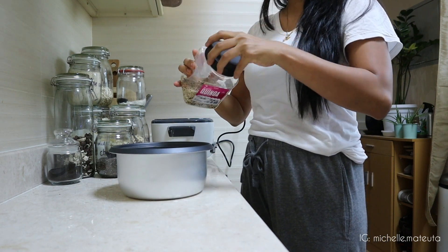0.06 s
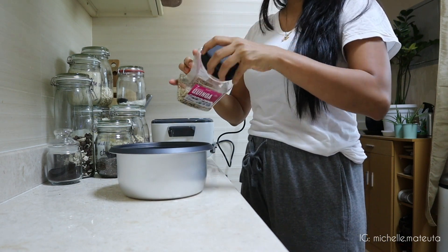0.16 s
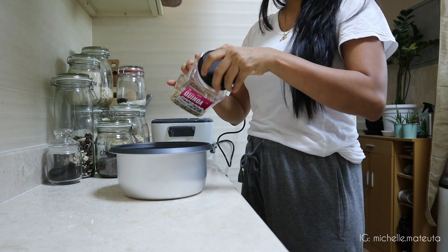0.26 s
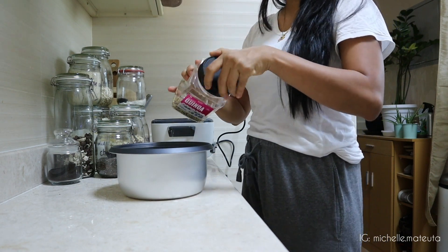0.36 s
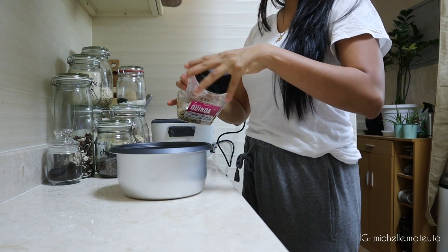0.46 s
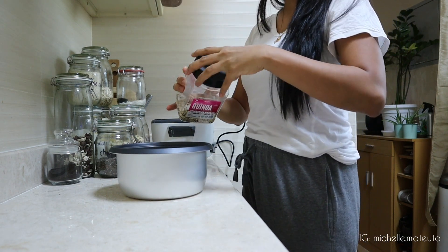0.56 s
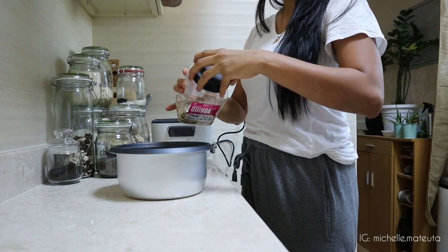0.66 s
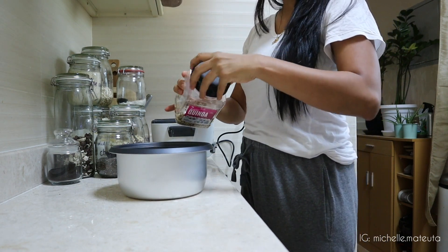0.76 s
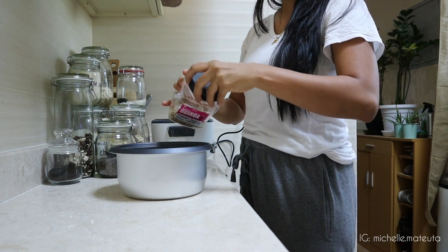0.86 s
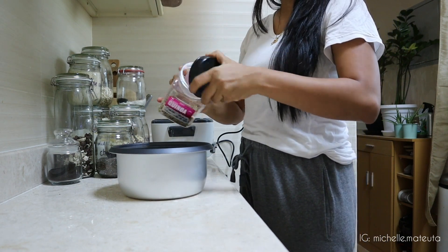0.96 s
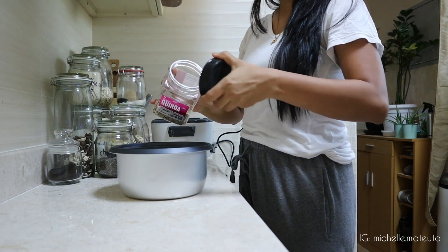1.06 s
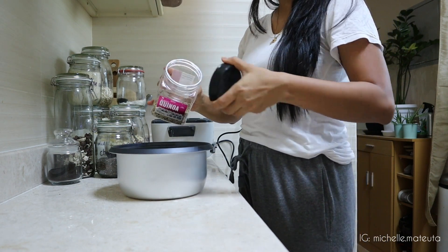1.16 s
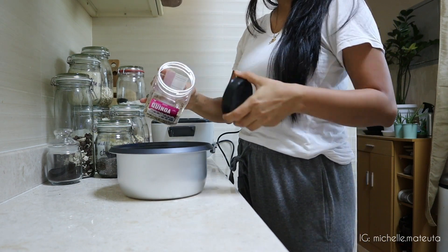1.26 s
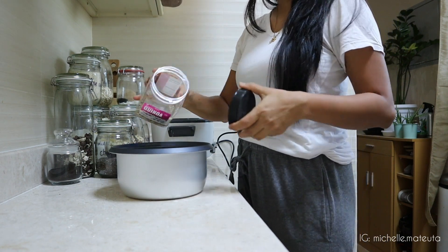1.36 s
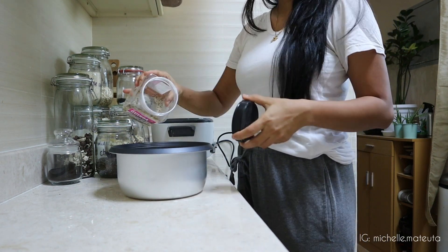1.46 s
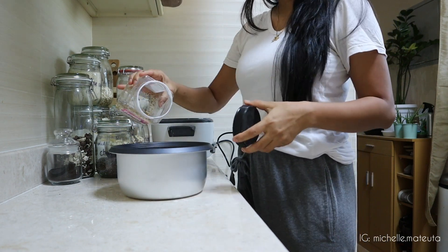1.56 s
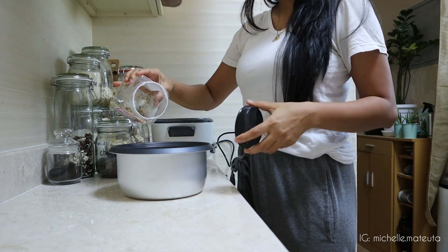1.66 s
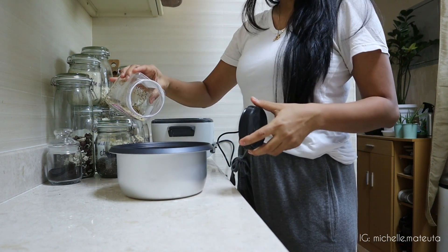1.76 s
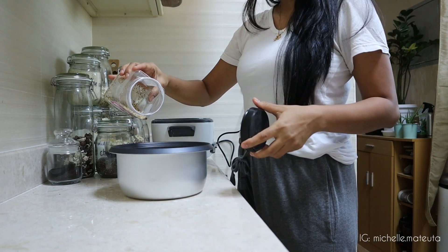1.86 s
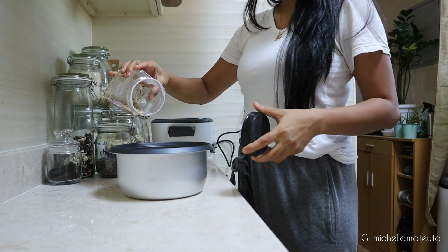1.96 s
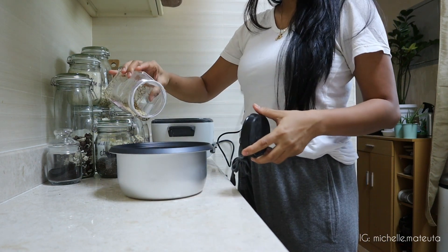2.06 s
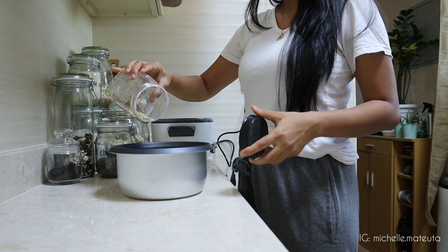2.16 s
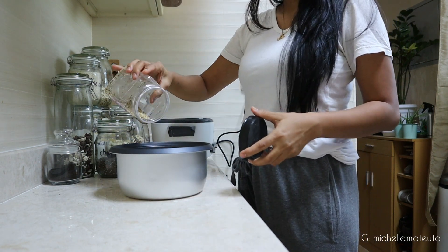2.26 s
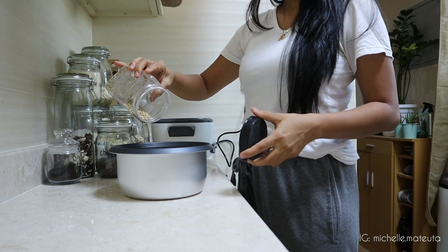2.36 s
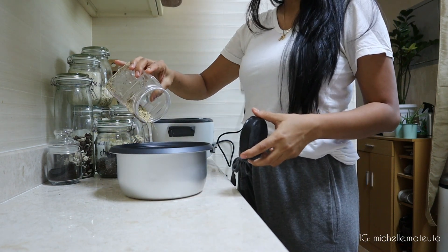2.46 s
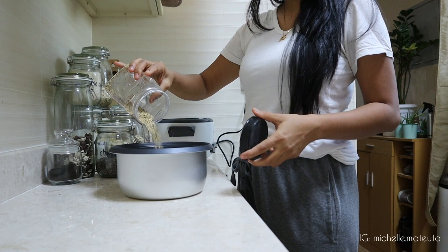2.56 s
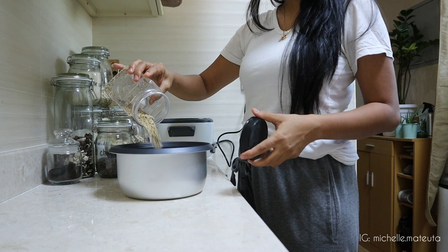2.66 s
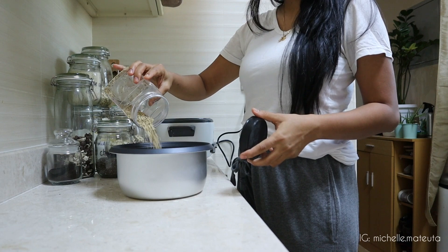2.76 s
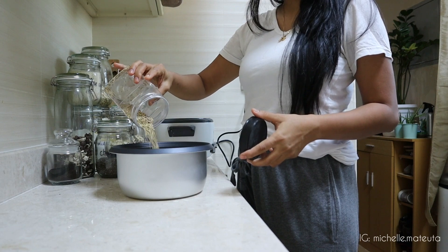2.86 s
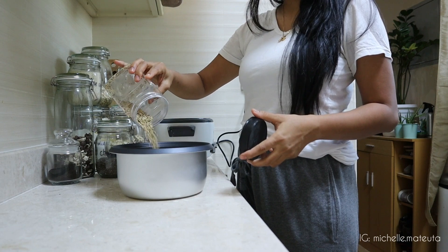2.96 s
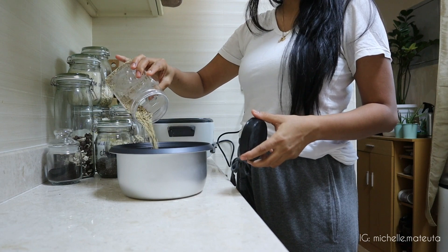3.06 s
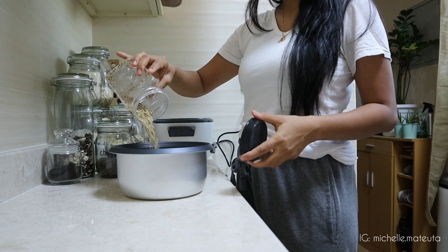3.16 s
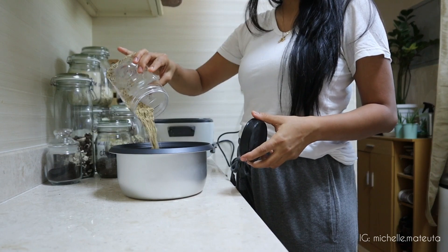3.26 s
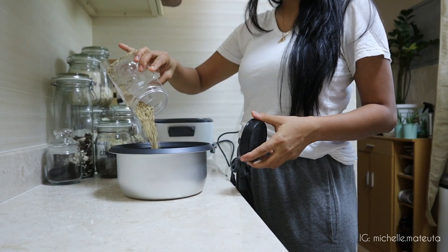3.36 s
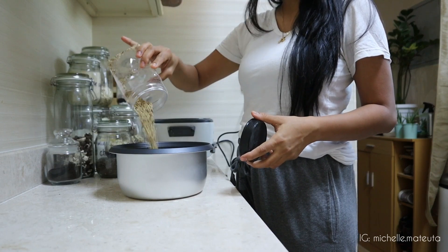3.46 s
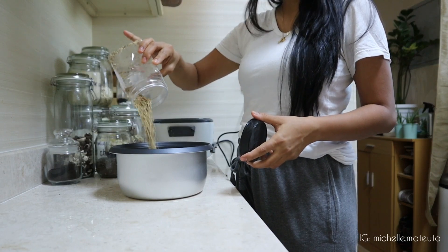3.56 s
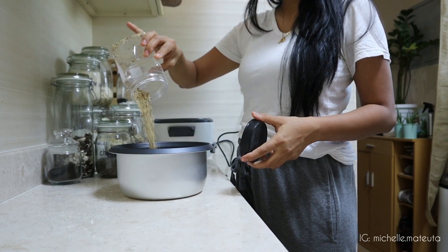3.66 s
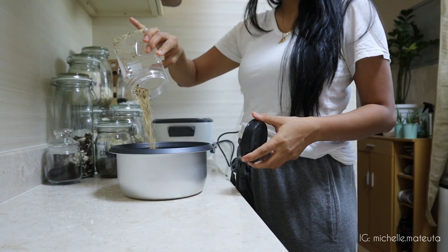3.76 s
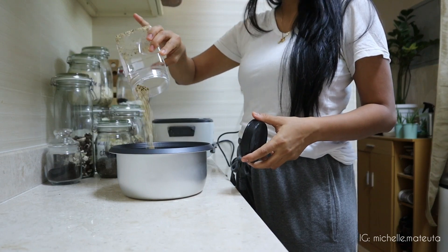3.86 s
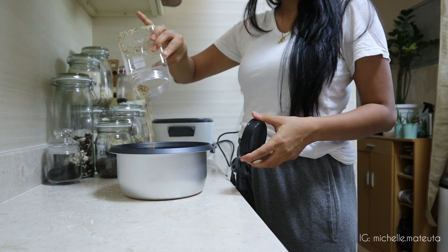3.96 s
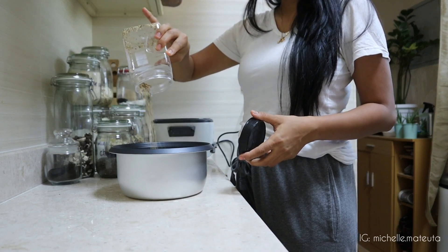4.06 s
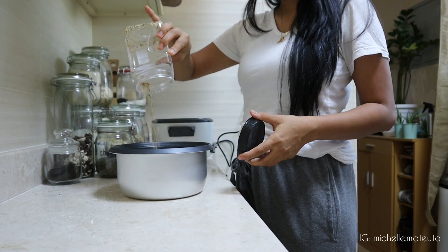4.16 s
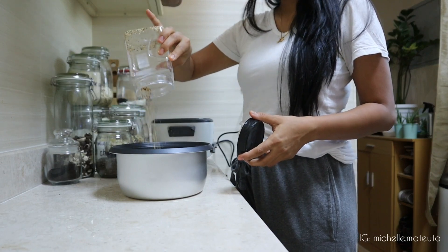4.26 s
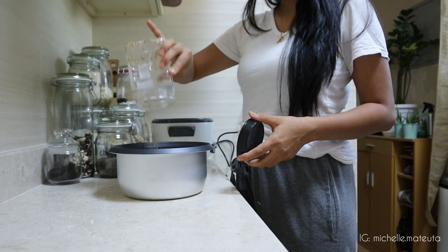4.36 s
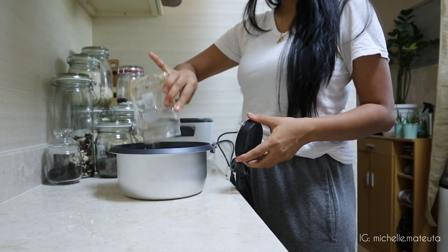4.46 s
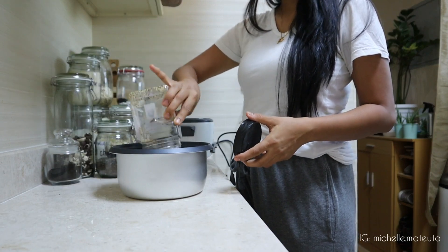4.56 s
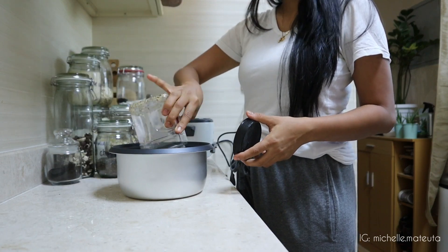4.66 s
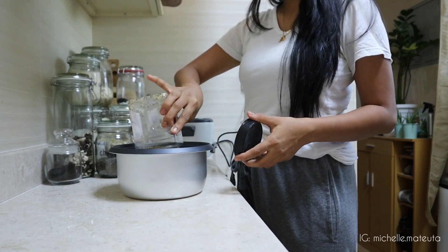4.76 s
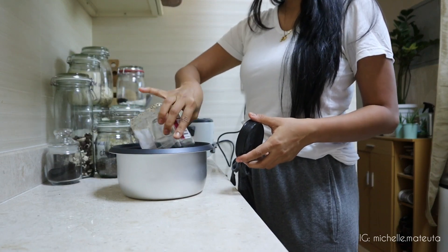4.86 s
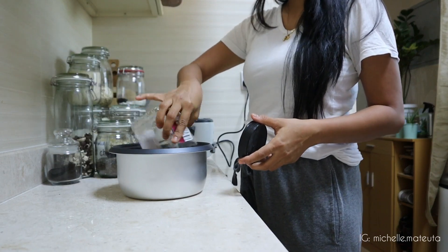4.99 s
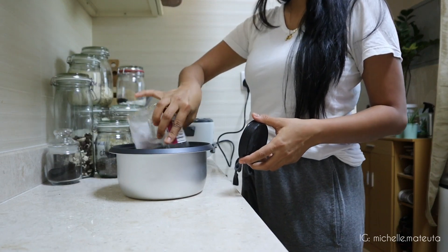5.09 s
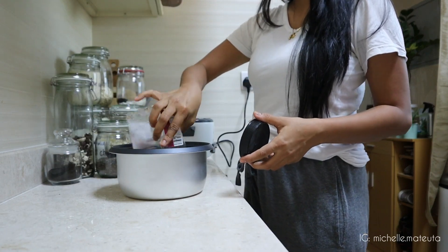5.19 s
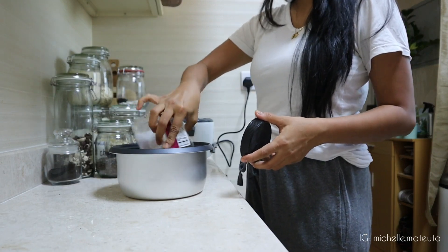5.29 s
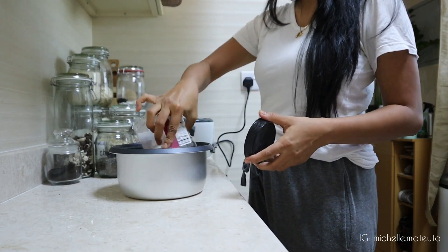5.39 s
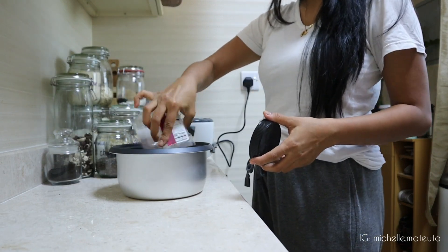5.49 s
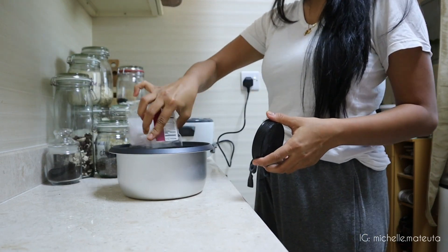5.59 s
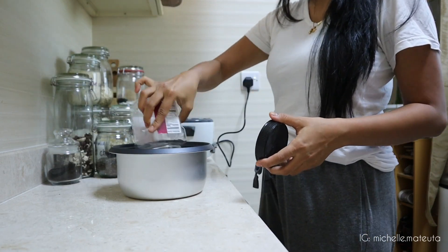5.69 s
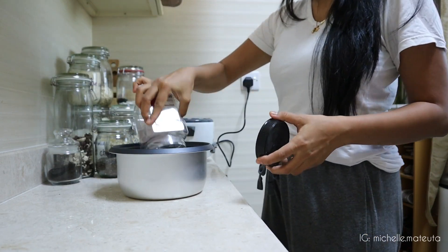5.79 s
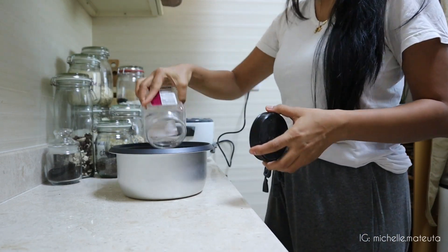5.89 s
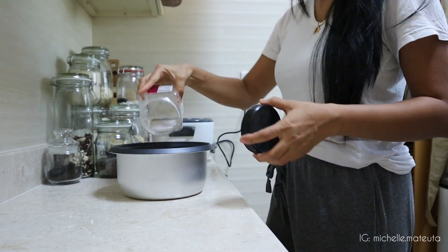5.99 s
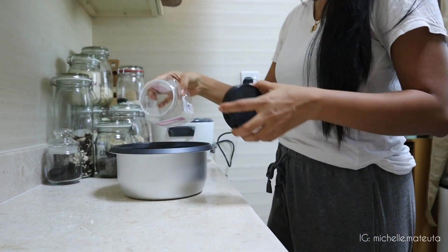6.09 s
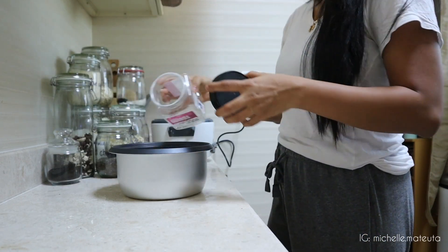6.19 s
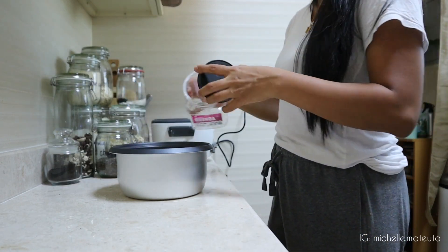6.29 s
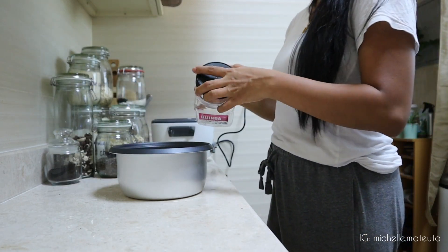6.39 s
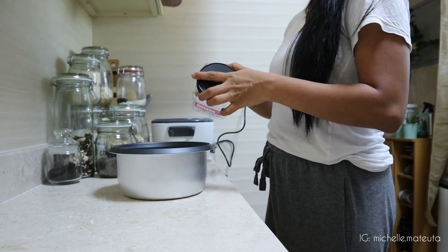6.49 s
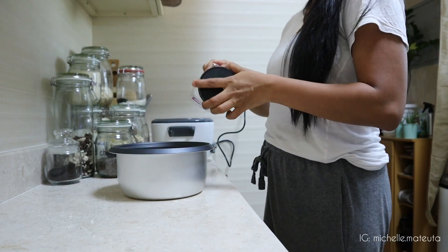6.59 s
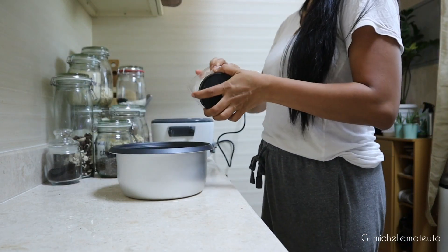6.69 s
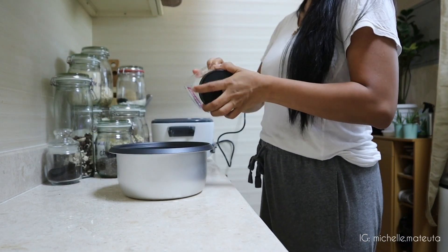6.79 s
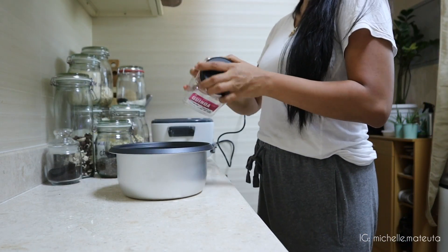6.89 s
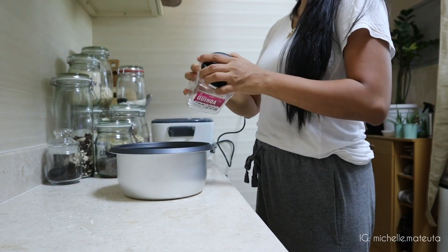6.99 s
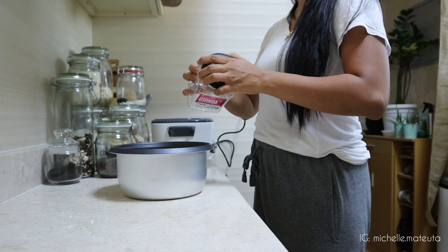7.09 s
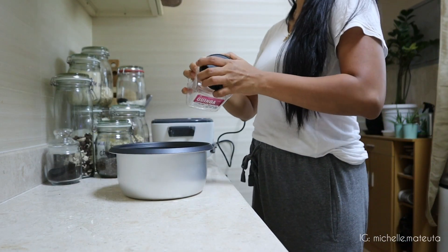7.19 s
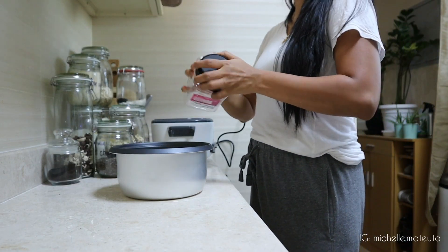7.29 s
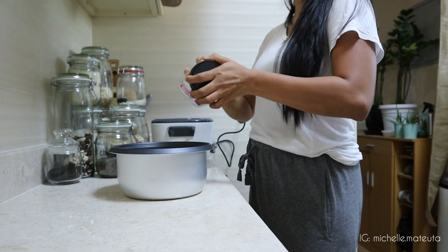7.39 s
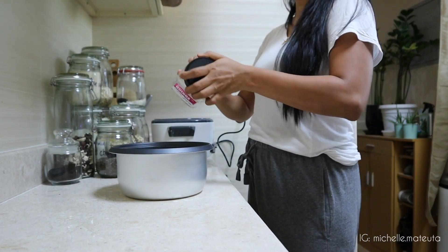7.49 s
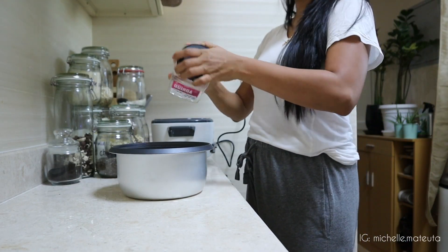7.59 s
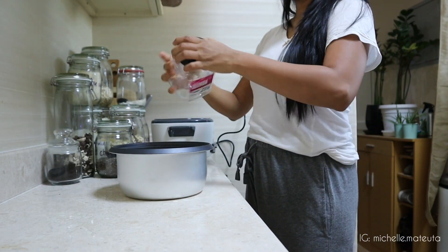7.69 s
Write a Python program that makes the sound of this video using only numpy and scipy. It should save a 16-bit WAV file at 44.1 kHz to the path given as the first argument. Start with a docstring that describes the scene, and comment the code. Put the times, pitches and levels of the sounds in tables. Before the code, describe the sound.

A still kitchen with faint air noise and low electrical hum, heard closely with a short room reverberation. From 0 to 0.9 s a lid rubs and rasps softly on a jar's neck, with low handling rumble; at about 1.0 s it comes off with a hollow pop and crisp crack. Between 1.7 and 2.6 s dry grains rustle along the jar, a few ticking loose. At 2.7 s they pour into a metal pot: a dense, bright hiss with metallic ringing that soon dulls as the heap covers the base. The stream weakens after 4.5 s; small clumps shake out near 5.0, 5.1 and 5.9 s, rattling the emptied jar, then single ticks fade. From 6.4 to 6.8 s the lid knocks hollowly in a rapid cluster with scraping twists. Softer bumps follow at 7.1 s, a loud sharp snap at 7.4 s, then faint rubbing to 7.7 s.

```python
"""Over a faint kitchen hum a lid rubs on the neck of a jar, then comes off with a pop.
Dry grains slide to the mouth as a rustle of random contacts and stream into a metal pot as dense impacts.
These excite the pot's modes until the heap damps them; the last grains rattle out of the jar one by one.
The lid is then knocked into place, turned and snapped shut: blows excite air, walls and rim, twists stick and slip."""
import sys
import numpy as np
from scipy import signal
from scipy.fft import rfft, irfft
from scipy.io import wavfile

SR = 44100
rng = np.random.default_rng(int(sys.argv[2]) if len(sys.argv) > 2 else 0)


def log_audio(samples):
    """Write samples as a 16-bit WAV file to the path given in sys.argv[1]."""
    # one column per channel
    frames = np.atleast_2d(samples).T
    # limit to full scale, then quantise
    limited = np.clip(frames, -1, 1)
    pcm = np.round(limited * 32767).astype(np.int16)
    wavfile.write(sys.argv[1], SR, pcm)


N = 341334  # samples


def from_db(db):
    """Level to amplitude ratio."""
    return 10 ** (np.asarray(db) / 20)


def rms_one(x):
    """Normalisation to unit mean-square power."""
    return x / np.sqrt(np.mean(x ** 2) + 1e-20)


def at_hz(points, hz):
    """Interpolation of a table along a logarithmic frequency axis."""
    f, value = np.transpose(points)
    return np.interp(np.log(np.maximum(hz, 1)), np.log(f), value)


def colour(x, spectrum, size=4096):
    """Minimum-phase filtering: folding the cepstrum makes the given magnitude spectrum causal."""
    hz = np.fft.rfftfreq(size, 1 / SR)
    log_gain = np.log(from_db(at_hz(spectrum, hz)))
    cepstrum = irfft(log_gain)
    cepstrum[1:size // 2] *= 2
    cepstrum[size // 2 + 1:] = 0
    response = irfft(np.exp(rfft(cepstrum)))
    return signal.oaconvolve(x, response)[:len(x)]


def resonate(x, modes):
    """Modal superposition: parallel damped resonances of alternating sign."""
    out = 0
    for k, (hz, width_hz, db) in enumerate(modes):
        radius = np.exp(-np.pi * width_hz / SR)
        gain = (-1) ** k * from_db(db) * (1 - radius * radius) / 2
        poles = [1, -2 * radius * np.cos(2 * np.pi * hz / SR), radius * radius]
        out = out + signal.lfilter(gain * np.array([1, 0, -1]), poles, x + 1e-18)
    return out


def impacts(per_s, spread_db):
    """Shot noise: random contacts of uneven size, each a tiny crunch; unit power at any rate."""
    decay_s = 0.0011  # power of one crunch falls by a factor e
    chance = np.clip(per_s / SR, 1e-6, 1)
    sizes = from_db(spread_db * np.minimum(rng.exponential(1, N), 4))
    # dividing by the chance keeps the mean power independent of the rate
    contacts = sizes ** 2 * (rng.random(N) < chance) / chance
    power = signal.lfilter([1], [1, -np.exp(-1 / (decay_s * SR))], contacts + 1e-18)
    return rms_one(np.sqrt(power) * rng.standard_normal(N))


def burst(t60, size=12000):
    """Transient contact noise with exponential decay, 60 dB in t60 seconds."""
    return rng.standard_normal(size) * from_db(-60 * np.arange(size) / SR / t60)


def blow(x, db, size=882):
    """Level of a transient, set by the mean power of its first 20 ms."""
    return from_db(db) * x / np.sqrt(np.mean(x[:size] ** 2) + 1e-20)


def add(out, s, x):
    """Linear superposition of x at time s."""
    i = int(s * SR)
    out[i:i + len(x)] += x[:N - i]


def gain_curve(rows):
    """Amplitude envelope interpolated in decibels, fading out within 20 ms beyond its ends."""
    s, db = np.transpose(rows)
    t = np.arange(N) / SR
    gate = np.interp(t, [s[0] - .02, s[0], s[-1], s[-1] + .02], [0, 1, 1, 0])
    return gate * from_db(np.interp(t, s, db))


def stroke(start_s, held_s, attack_s, fade_db_per_s):
    """Envelope of one movement: linear rise, then exponential fading from held_s after its start."""
    t = np.arange(N) / SR - start_s
    return np.clip(t / attack_s, 0, 1) * from_db(-fade_db_per_s * np.maximum(t - held_s, 0))


# strength of the kitchen's reflections: f/Hz, relative level/dB
REFLECTION_SPECTRUM = [(150, -10.5), (500, 3), (1100, 3.5), (15000, 0)]
# reverberation time of the kitchen: f/Hz, t/s
REVERBERATION_TIME = [(150, 0.14), (500, 0.28), (1500, 0.38), (4000, 0.43), (9000, 0.24), (15000, 0.34)]


def kitchen(x, wet_db, gap_s, size=22050):
    """Diffuse reverberation: direct sound plus dense reflections that decay band by band."""
    t = np.arange(size) / SR
    edges = np.geomspace(100, 19000, 9)
    tail = 0
    for low, high in zip(edges, edges[1:]):
        hz = np.sqrt(low * high)
        bandpass = signal.butter(2, [low, high], "band", fs=SR, output="sos")
        band = signal.sosfilt(bandpass, rng.standard_normal(size))
        decay_db = at_hz(REFLECTION_SPECTRUM, hz) - 60 * t / at_hz(REVERBERATION_TIME, hz)
        tail = tail + band * from_db(decay_db)
    tail = tail * np.clip(t / gap_s - 1, 0, 1)  # silent for gap_s, then rising over gap_s
    reflections = signal.oaconvolve(x, tail / np.linalg.norm(tail))[:N]
    return x + from_db(wet_db) * reflections


# spectrum of the still kitchen's air: f/Hz, relative level/dB
AIR_SPECTRUM = [(20, -2), (60, -18), (110, -17.5), (190, 0.5), (270, -10), (450, -7), (950, -11.5),
                (1400, -15), (3500, -14.5), (8000, -21), (15000, -21)]
# level of the background, which dips after 2.5 s and recovers by 6.2 s: t/s, relative level/dB
BACKGROUND_LEVEL = [(0, 3.5), (2.55, 0.5), (3.0, -5), (6.2, 1.5), (7.74, -2)]
# hands shifting their grip: start t/s, hold t/s, rumble level/dB
GRIP_CHANGES = [(0.0, 0.15, -58), (0.47, 0.4, -48), (6.5, 0.22, -56), (7.32, 0.14, -62)]


def background(air_db, hum_db, hum_hz, rumble_db):
    """Stationary noise and a wavering appliance hum, with a low rumble swelling at each change of grip."""
    air = from_db(air_db) * rms_one(colour(rng.standard_normal(N), AIR_SPECTRUM))
    waver = rms_one(resonate(rng.standard_normal(N), [(hum_hz, 10, 0), (153, 10, -3)]))
    tone = np.sin(2 * np.pi * hum_hz * np.arange(N) / SR)
    hum = from_db(hum_db) * (tone + 1.02 * waver)
    rumble_spectrum = [(10, -9.5), (30, -10.5), (70, 1.0), (120, -32), (400, -80)]  # f/Hz, relative level/dB
    rumble = rms_one(colour(rng.standard_normal(N), rumble_spectrum))
    handling = sum(from_db(db) * stroke(s, held_s, attack_s=0.14, fade_db_per_s=70)
                   for s, held_s, db in GRIP_CHANGES)
    steady = air + hum + from_db(rumble_db) * rumble
    return gain_curve(BACKGROUND_LEVEL) * steady + handling * rumble


# spectrum of the jar body shaken by the lid: f/Hz, relative level/dB
RUBBED_BODY_SPECTRUM = [(40, -44), (150, -13.5), (270, -1), (340, -9.5), (425, 5), (540, -7.5), (700, -2),
                        (860, -1), (1150, -11), (1400, -7), (1650, -10.5), (1950, -5), (2600, -12),
                        (5000, -57)]
# spectrum of the rasping thread: f/Hz, relative level/dB
RASP_SPECTRUM = [(200, -44), (800, 11), (2000, -12), (3200, 9), (4500, 5), (5800, 7), (7500, 1.5),
                 (11500, -0.5), (15500, -9)]
# twists of the lid on the neck: start t/s, hold t/s, relative levels of jar body/dB and rasp/dB, fading/(dB/s)
LID_TWISTS = [(0.0, 0.31, -44.5, -41.5, 150), (0.33, 0.07, -40.5, -43.5, 163), (0.464, 0.033, -48, -39, 87),
              (0.65, 0.02, -47.5, -58, 300), (0.8, 0.29, -45, -48, 146), (6.458, 0.025, -23, -37, 448),
              (6.565, 0.026, -24, -38, 450), (6.646, 0.02, -27.5, -29.5, 170),
              (6.76, 0.074, -40.5, -51.5, 150), (6.919, 0.064, -38, -42, 73),
              (7.41, 0.062, -26.5, -31, 127), (7.58, 0.15, -44, -41.5, 100), (7.7, 0.05, -36, -42, 100)]


def lid_rubbing(body_db, rasp_db):
    """Stick-slip friction: tiny slips of the thread rasp and shake the jar in each twist."""
    slips = impacts(5000, spread_db=-1.5)
    body = from_db(body_db) * rms_one(colour(slips, RUBBED_BODY_SPECTRUM))
    rasp = from_db(rasp_db) * rms_one(colour(slips, RASP_SPECTRUM))
    out = np.zeros(N)
    for s, held_s, jar_db, thread_db, fade in LID_TWISTS:
        twist = from_db(jar_db) * body + from_db(thread_db) * rasp
        out += stroke(s, held_s, attack_s=0.014, fade_db_per_s=fade) * twist
    return out


# lid against jar: t/s, levels of air thump/dB, wall/dB and crack/dB before the bass cut,
# hollow ring f/Hz, which depends on how the lid sits
LID_BLOWS = [(0.771, -44.5, -51, -68, 409), (0.802, -42, -50, -61, 452), (0.9715, -27, -34, -14.5, 417),
             (0.978, -18, -24, -38, 438), (6.444, -18, -25, -38, 525), (6.4673, -14.5, -19, -35.5, 531.4),
             (6.48, -19.5, -36, -44, 530), (6.509, -19.5, -28.5, -46, 512), (6.54, -30, -26, -41, 490),
             (6.567, -30, -32, -32.5, 515), (6.586, -17, -44, -38, 430), (6.658, -28, -28, -28.5, 401),
             (6.719, -30.5, -38, -38, 427), (6.811, -24.5, -31.5, -43.5, 434),
             (7.072, -51, -50, -41.5, 420), (7.094, -31.5, -56, -66, 288), (7.121, -26, -42, -68, 409),
             (7.14, -28, -42, -70, 281), (7.319, -66, -71, -57, 426), (7.4023, -17.5, -31, -11.5, 344),
             (7.4114, -23, -20, -30, 288), (7.478, -26.5, -26, -34, 353), (7.634, -55, -64, -39.5, 412)]
# modes of the lid panel: f/Hz, width/Hz, relative level/dB
LID_PANEL_MODES = [(88.6, 6.2, -7.5), (169, 11.6, -6.5), (192.4, 13, -4), (206, 46, -3), (293, 7.7, -1.5),
                   (334.2, 4.8, 0), (430, 6, -2.5), (578.5, 39, -7)]
# modes of the walls: f/Hz, width/Hz, relative level/dB
WALL_MODES = [(874, 103, 0.5), (996, 28, -9.5), (1124, 45, 3.5), (1255, 28, 6), (1347, 31, 8),
              (1504, 55, -0.5), (1750, 200, -5), (2053, 120, -3.5), (2520, 29, -6), (2825, 87, -4.5),
              (3320, 86, -15.5)]
# spectrum of the crack at the rim: f/Hz, relative level/dB
CRACK_SPECTRUM = [(60, -43), (400, -29), (1200, 5.5), (2200, -1.5), (3200, 5), (4400, -1), (5700, 4.5),
                  (7200, -1.5), (9000, -6), (11000, -3.5), (15500, -10)]


def lid_knocks(air_width_hz, air_db, crack_t60, chatter_t60, chatter_db, wet_db):
    """Impulse excitation: each blow pumps the enclosed air, rings the walls and cracks at the rim."""
    direct, to_room = np.zeros(N), np.zeros(N)
    click = signal.unit_impulse(12000)
    for s, thump_db, wall_db, crack_db, air_hz in LID_BLOWS:
        thump = resonate(click, LID_PANEL_MODES + [(air_hz, air_width_hz, air_db)])
        wall = resonate(click, WALL_MODES)
        body = blow(thump, thump_db) + blow(wall, wall_db)
        rim_noise = burst(crack_t60) + from_db(chatter_db) * burst(chatter_t60)
        add(direct, s, body + blow(colour(rim_noise, CRACK_SPECTRUM), crack_db))
        # summed over all directions, the crack's ragged spectrum evens out
        add(to_room, s, body + blow(colour(click, CRACK_SPECTRUM), crack_db))
    reflections = kitchen(to_room, wet_db, gap_s=0.00081) - to_room
    knocks = direct + reflections
    # a small jar radiates no deep bass
    return signal.sosfilt(signal.butter(2, 90, "high", fs=SR, output="sos"), knocks)


# grains sliding along the tilted jar: t/s, relative level/dB
SLIDE_LEVEL = [(1.15, -55), (1.6, -75), (1.69, -45), (1.78, -38.5), (1.96, -37), (2.27, -45.5), (2.68, -38)]
# spectrum of the sliding rustle: f/Hz, relative level/dB
RUSTLE_SPECTRUM = [(250, -10), (420, -3.5), (600, 0.5), (1100, -3.5), (2000, -5), (2800, 3), (4500, 0),
                   (5800, 2.5), (7000, -4.5), (10000, -9), (15500, -16)]
# spectrum of grain ticks, shared by sliding, lone grains and the heap: f/Hz, relative level/dB
GRAIN_SPECTRUM = [(60, -46), (300, -28), (600, -24), (1000, -15.5), (1300, -12.5), (1800, -14), (2500, -8),
                  (4000, -7), (5600, -1.5), (7000, -5), (8000, 0.5), (12000, 1), (15500, -2)]


def sliding(level_db, bright_db):
    """Granular friction: countless soft touches as the heap creeps to the mouth, brighter when faster."""
    level = gain_curve(SLIDE_LEVEL)
    rustle = rms_one(colour(impacts(9000, spread_db=2.2), RUSTLE_SPECTRUM))
    fizz = rms_one(colour(impacts(9000, spread_db=2.2), GRAIN_SPECTRUM))
    brightness = from_db(bright_db) * level / level.max()
    return level * (from_db(level_db) * rustle + brightness * fizz)


# single grains and small clumps: t/s, relative level of the tick/dB, relative level of the ring/dB
LONE_GRAINS = [(2.4233, -25.5, -38), (2.6108, -16.5, -29), (2.665, -21, -40), (2.6828, -13, -37),
               (5.2982, -15, -33), (5.443, -18, -48), (5.504, -25, -51), (5.551, -17, -48),
               (5.6715, -20, -44), (5.7648, -26, -34), (5.7883, -22, -28), (5.9233, -27, -39),
               (6.0146, -32.5, -41), (6.0623, -30.5, -56), (6.1478, -28.5, -46), (6.176, -40, -38.5),
               (6.2587, -30.5, -58), (6.3599, -37, -50)]
# modes rung by a lone grain: f/Hz, width/Hz, relative level/dB
LONE_GRAIN_MODES = [(2467, 7, -6), (2730, 34, -9.5), (5320, 62, -8), (5650, 70, -7)]


def stray_grains(tick_db, ring_db, tick_t60):
    """Isolated impacts: lone grains and clumps each give a dry tick and a short ring of the jar."""
    out, click = np.zeros(N), signal.unit_impulse(12000)
    for s, grain_db, jar_db in LONE_GRAINS:
        tick = colour(burst(tick_t60), GRAIN_SPECTRUM)
        ring = resonate(click, LONE_GRAIN_MODES)
        add(out, s, blow(tick, grain_db + tick_db) + blow(ring, jar_db + ring_db))
    return out


# steady stream landing in the pot; drives hiss, impact rate and ringing: t/s, relative level/dB
STREAM_LEVEL = [(2.68, -23.5), (2.76, -14), (2.86, -16), (3.17, -18.5), (3.56, -16.5), (4.51, -19),
                (4.76, -23.5), (5.25, -27), (5.62, -33.5), (6.42, -58.5)]
# clumps shaken loose from the nearly empty jar: start t/s, hold t/s, swell level/dB
CLUMP_SWELLS = [(5.01, 0.035, 4.5), (5.14, 0.057, 2), (5.86, 0.034, 4.5)]


def stream_strength():
    """Source strength of the pour: a steady stream, swollen briefly by each clump."""
    swell_db = sum(db * stroke(s, held_s, attack_s=0.011, fade_db_per_s=350)
                   for s, held_s, db in CLUMP_SWELLS)
    return gain_curve(STREAM_LEVEL) * from_db(swell_db)


def flow(stream):
    """Impact rate by a power law: a weak stream breaks up into separate ticks."""
    trickle_per_s, full_per_s = 73, 7000  # rate of a dry stream, and the rate added at full flow
    full_stream_db, exponent = -17, 1.6
    return trickle_per_s + full_per_s * (stream / from_db(full_stream_db)) ** exponent


def heap_hiss(stream, level_db, spread_db, wet_db, count=4):
    """Incoherent sources: grains tick on grain all over the heap, each spot with its own echoes."""
    ticks = 0
    for spot in range(count):
        landing = stream * impacts(flow(stream) / count, spread_db)
        ticks = ticks + kitchen(landing, wet_db, gap_s=0.00037)
    return from_db(level_db) / np.sqrt(count) * colour(ticks, GRAIN_SPECTRUM)


def drummed(stream, modes):
    """Random modal excitation: a vessel kept ringing by the rain of grains."""
    return stream * rms_one(resonate(impacts(flow(stream), spread_db=2.0), modes))


# modes of the pot's wall: f/Hz, width/Hz, relative level/dB
POT_WALL_MODES = [(1170, 30, -12), (1215, 22, -7), (1300, 35, -10), (1382, 25, -6), (1440, 30, -11),
                  (1585, 15, -9), (1770, 15, -9), (1860, 30, -14), (2215, 35, -6), (2264, 12, 6),
                  (2380, 50, -11), (2517, 16, -5), (3100, 40, -9), (3380, 45, -7), (3688, 30, -5),
                  (4110, 50, -7), (4297, 28, -3), (4845, 27, -6), (5598, 35, 2), (5735, 22, 2),
                  (6390, 30, -3), (7418, 16, -2), (7815, 35, -3), (8060, 200, -7), (9430, 60, -6),
                  (9620, 30, -5)]
# modes of the pot's base: f/Hz, width/Hz, relative level/dB
POT_BASE_MODES = [(699, 13, -11.5), (1420, 12, -29), (1614, 10, -4), (1830, 25, -25.5), (2540, 22, -17),
                  (2658, 27, 2), (2820, 43, -9), (3090, 45, 2), (4066, 79, 3.5), (4870, 14, 11.5),
                  (5780, 57, 9.5), (6340, 17, 7.5), (7070, 170, 0.5)]


def pot_ring(stream, wall_db, wall_damping_db, base_db, base_damping_db):
    """Damping by load: the growing heap dulls the wall and smothers the base; a shorter fall rings it less."""
    lowering_s, lowering_over_s, lowering_loss_db = 4.46, 0.17, 1.5  # the jar is lowered to the pot's rim
    poured = np.cumsum(stream ** 2) / np.sum(stream ** 2)  # share of the total, 0 to 1
    lowered = np.clip((np.arange(N) / SR - lowering_s) / lowering_over_s, 0, 1)
    wall = from_db(wall_db - wall_damping_db * poured ** 2) * drummed(stream, POT_WALL_MODES)
    base = from_db(base_db - base_damping_db * poured ** 2) * drummed(stream, POT_BASE_MODES)
    return from_db(-lowering_loss_db * lowered) * (wall + base)


# modes of the empty jar: f/Hz, width/Hz, relative level/dB
EMPTY_JAR_MODES = [(202, 33, -17), (432, 18.5, -2), (590, 52, -13.5), (721, 14, -2), (910, 130, -12),
                   (1129, 33, -5), (1440, 480, -13.5), (2400, 81, -10), (2840, 120, -6.5),
                   (3690, 290, -5.5), (5650, 320, -6.5)]


def jar_ring(stream, level_db):
    """Release of damping: as the wall comes free of grains, the last ones drum on it."""
    bare_s, bare_over_s = 4.704, 0.46  # when the wall starts to come free, and how long that takes
    bare = np.clip((np.arange(N) / SR - bare_s) / bare_over_s, 0, 1)
    return from_db(level_db) * bare * drummed(stream, EMPTY_JAR_MODES)


def scene():
    """Superposition of room, lid, grains, pot and jar at one microphone, on both channels."""
    room = background(air_db=-52.5, hum_db=-58.5, hum_hz=99.8, rumble_db=-67.0)
    rubbing = lid_rubbing(body_db=0.0, rasp_db=-2.0)
    knocks = lid_knocks(air_width_hz=18.2, air_db=8.0, crack_t60=0.028,
                        chatter_t60=0.061, chatter_db=-5.5, wet_db=-6.5)
    loose = sliding(level_db=-1.0, bright_db=-2.0)
    loose = loose + stray_grains(tick_db=-9.5, ring_db=-6.0, tick_t60=0.078)
    grains = kitchen(loose, wet_db=-5.5, gap_s=0.0053)
    stream = stream_strength()
    hiss = heap_hiss(stream, level_db=1.0, spread_db=3.5, wet_db=-0.5)
    pot = pot_ring(stream, wall_db=-4.5, wall_damping_db=8.0, base_db=-2.5, base_damping_db=35.0)
    jar = jar_ring(stream, level_db=-5.5)
    return np.tile(room + rubbing + knocks + grains + hiss + pot + jar, (2, 1))


def record(dry):
    """Amplitude limiting and band limiting: peaks beyond full scale clip and the top is cut."""
    cutoff_hz = 15900
    lowpass = signal.ellip(10, .1, 80, cutoff_hz, fs=SR, output="sos")
    return signal.sosfilt(lowpass, np.clip(dry, -1, 1))


dry = scene()
out = record(dry)
log_audio(out)
```